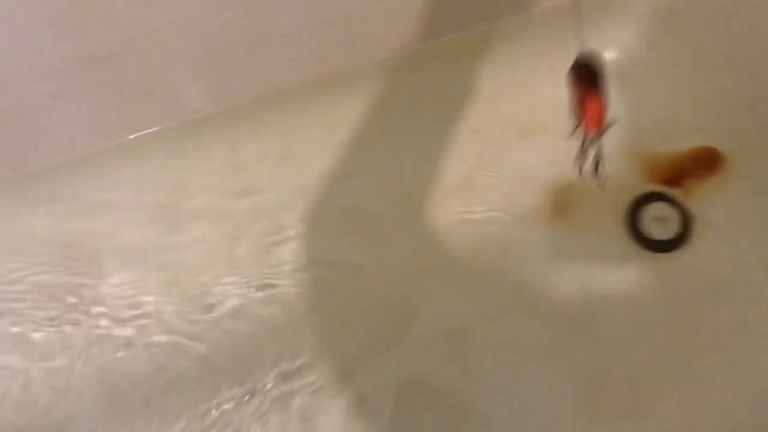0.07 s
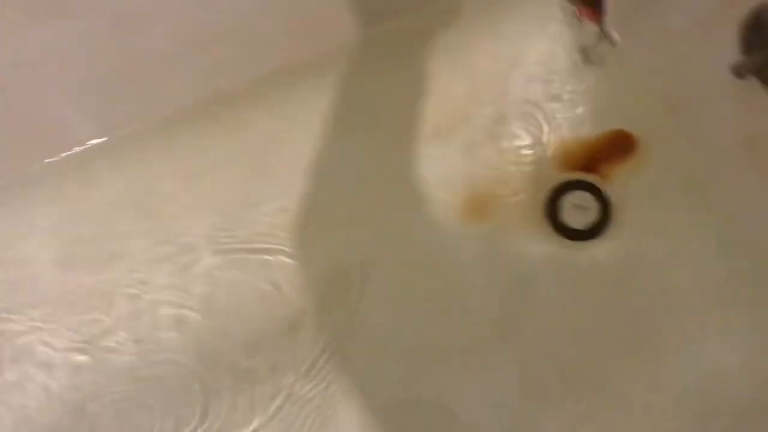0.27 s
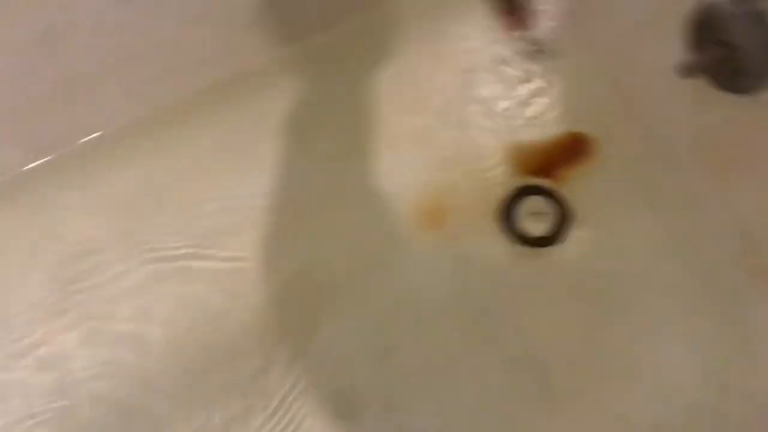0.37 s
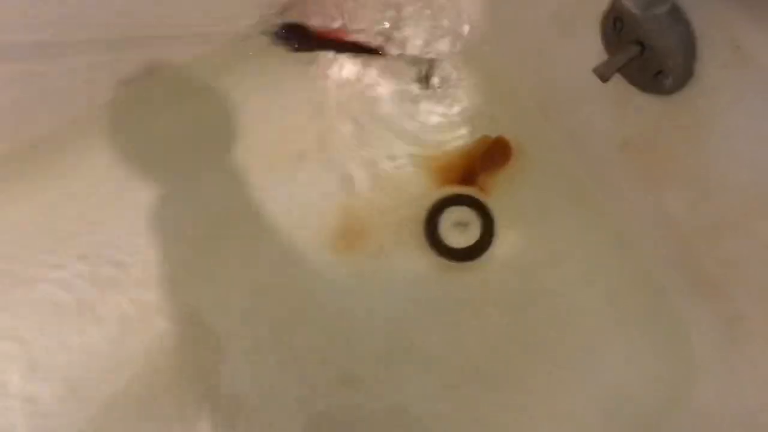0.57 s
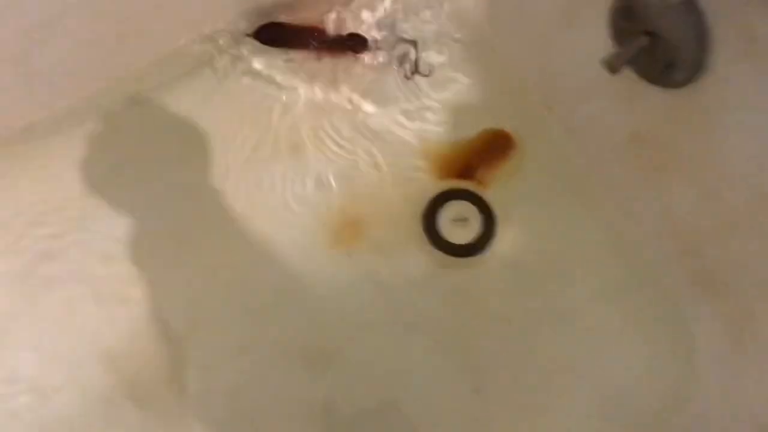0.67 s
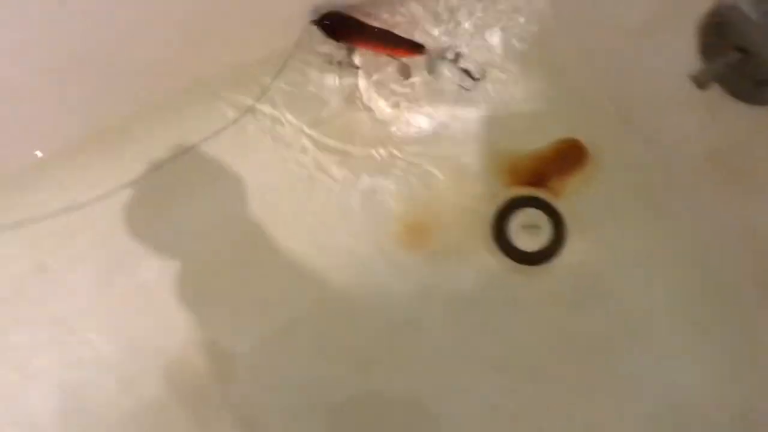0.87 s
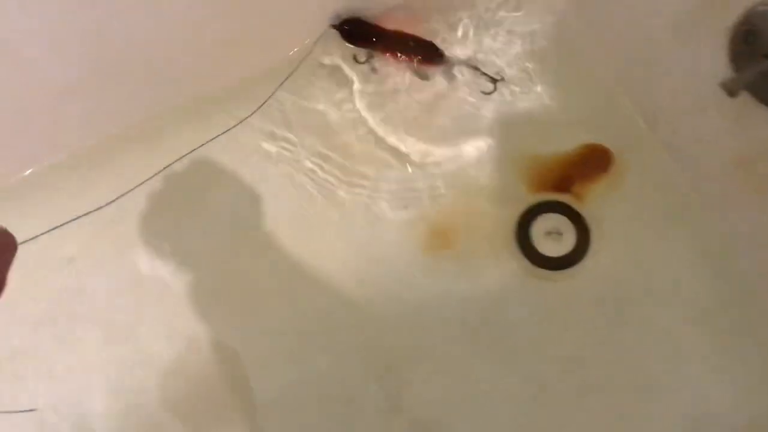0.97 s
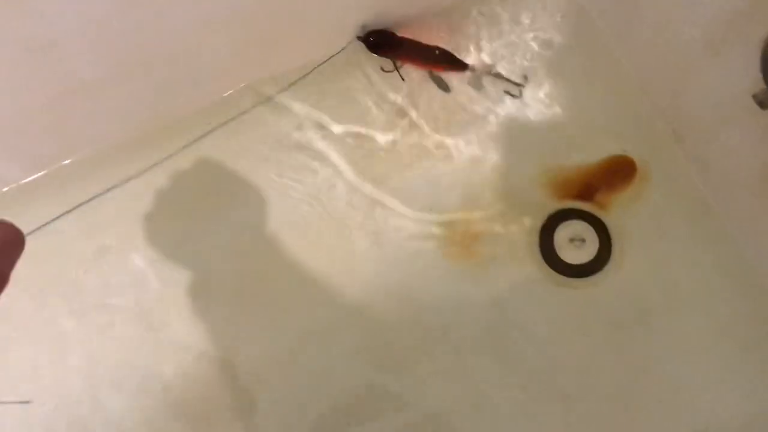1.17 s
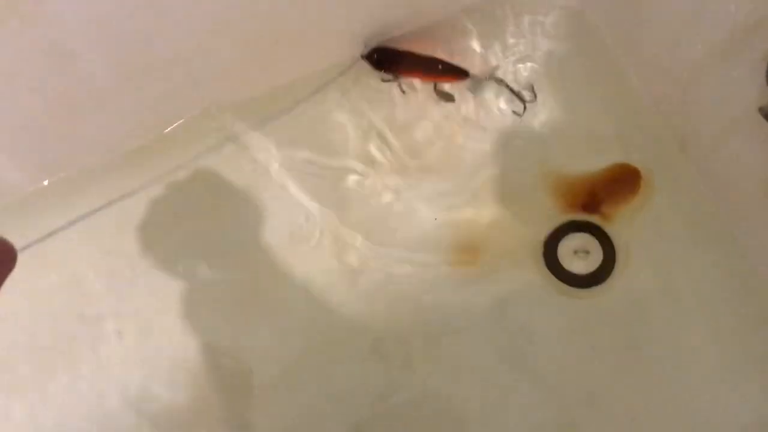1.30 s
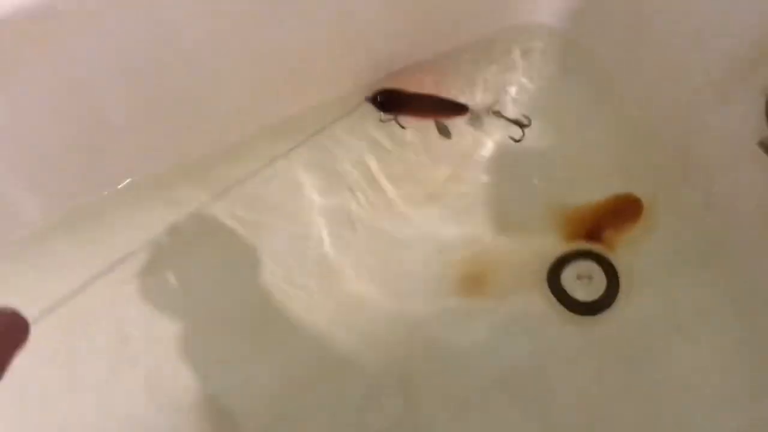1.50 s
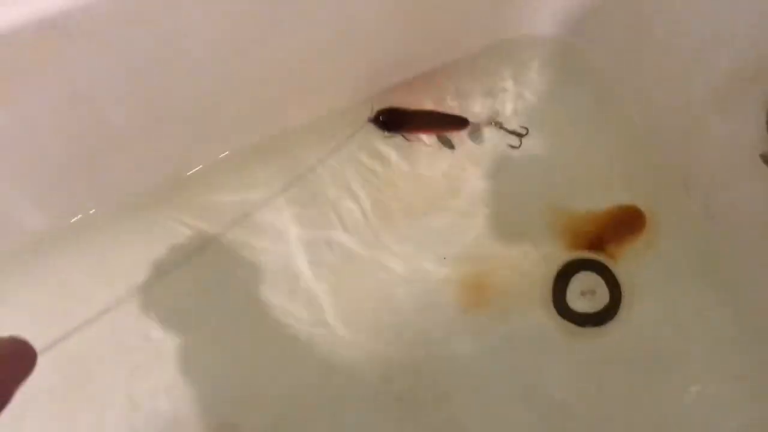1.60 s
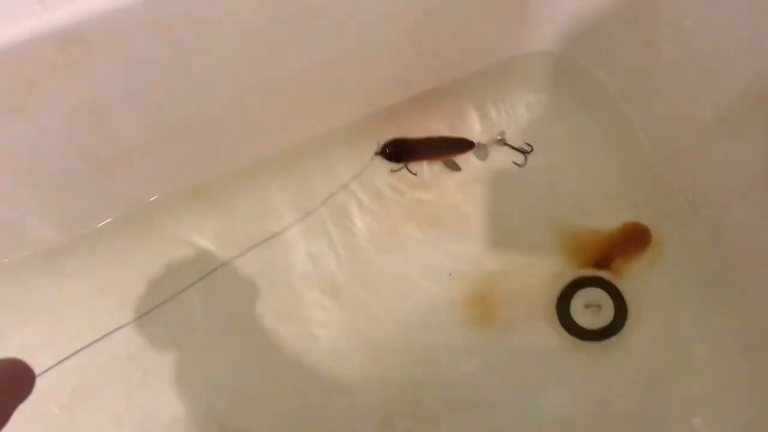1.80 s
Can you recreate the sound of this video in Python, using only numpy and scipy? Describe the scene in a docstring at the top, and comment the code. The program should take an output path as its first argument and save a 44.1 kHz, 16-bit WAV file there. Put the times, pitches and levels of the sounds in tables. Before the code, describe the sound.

Sharp splash of a lure dropping into bathwater, followed by one knock and faint hook ticks.

```python
"""In a small bathroom, a hard fishing lure drops into a shallow bath. It slaps the water, its hooks
jingle, trapped air gulps and spray patters back. It knocks once against the tub, then its hooks tick
and tremble as it drifts on the line. The tub and the room echo briefly, over a low, wavering hum."""
import sys
import numpy as np
from scipy import signal
from scipy.fft import rfft, irfft, next_fast_len
from scipy.io import wavfile
from scipy.ndimage import map_coordinates

SR = 44100
rng = np.random.default_rng(int(sys.argv[2]) if len(sys.argv) > 2 else 0)


def store_wav(level_fs):
    """Save 16-bit WAV to argv[1]."""
    pcm = np.round(np.clip(np.atleast_2d(level_fs), -1, 1) * 32767)
    wavfile.write(sys.argv[1], SR, pcm.T.astype(np.int16))


N = 81585

# The lure hits the water. A fade (t60 in the code) is the time a sound takes to drop by 60 dB.
# t/s, level/dB, attack/s, fade/s, plop level/dB, crack over fizz/dB, brightness/(dB per octave)
SLAPS = [(0.2216, -20.5, .0002, 0.13, -33, 7.5, 1), (0.2269, -24.5, 0.00043, 0.12, -48, -6, 0),
         (0.2501, -22, 0.0018, 0.078, -45, 2, 14), (0.2973, -20, 0.0026, 0.16, -45.5, -11, -0.5),
         (0.326, -24, 0.0038, 0.073, -50.5, -9, -5.5)]
# How strong the fizz and the plop are from low to high pitch (their "colour"): f/Hz, level/dB
FIZZ_COLOUR = [(300, -35), (1600, 0.5), (2400, 1), (4000, 2), (5200, 4.5), (6700, -11), (7800, -17),
               (8800, -1.5), (10300, -26), (12200, 6), (15500, -1)]
PLOP_COLOUR = [(60, -5.5), (190, -1), (400, 0), (750, 1), (1150, -6.5), (1600, -5), (2100, -6), (3000, -54)]
# The notes of the metal hooks, and of the hollow punched in the water: f/Hz, level/dB, fade/s
HOOK_NOTES = [(4740, -1, 0.071), (6659, -7.5, 0.23), (8820, -3, 0.21), (9400, -6, 0.14), (11870, 2, 0.17),
              (14500, 0, 0.12)]
HOLLOW_NOTES = [(360.5, -39, 0.3), (603, -32, 0.091), (1020, -26, 0.048)]

def splash():
    """The hooks and the hollow ring as the lure lands; each slap is a crack, a fizz and a low plop."""
    droplets = tiny_bubbles(per_s=2600, centre_hz=8710, spread=0.395, cycles=43, scatter_db=12.5)
    plop = noise(PLOP_COLOUR)
    landing = SLAPS[0][0]
    out = amp(-30) * ring(HOOK_NOTES, landing) + ring(HOLLOW_NOTES, landing)
    for start, db, attack, t60, plop_db, crack_db, tilt in SLAPS:
        spurts = amp(2 * wobble(per_s=450))  # the sheet of water tears unevenly
        fizz = unit(spurts * (noise(tilted(FIZZ_COLOUR, tilt)) + amp(-1) * droplets))
        crack = amp(crack_db) * burst(start, t60=0.0091, attack=attack)
        out += amp(db) * fizz * (burst(start, t60, attack) + crack) / 2
        out += amp(plop_db) * plop * burst(start, t60=0.11, attack=0.0099)
    return out


# The colour of the knock: f/Hz, level/dB
KNOCK_COLOUR = [(600, -19), (1200, -4.5), (2000, -1), (3300, 2), (4200, 5.5), (5000, -2), (6000, 1.5),
                (7800, -10), (8800, -1), (10000, -5), (12200, -4.5), (15500, -9)]
# The notes of the lure striking the tub: f/Hz, level/dB, fade/s
KNOCK_NOTES = [(1168, -9, 0.15), (1535, -3.5, 0.07), (4304, 4.5, 0.08), (5850, -5, .08), (7025, -9, 0.12)]

def knock(start=0.6116):
    """The hard lure hits the wall of the tub: a crack that echoes, and a short, close ring."""
    crack = noise(KNOCK_COLOUR) * burst(start, t60=0.0097, hold=0.0023)
    return amp(-20) * (bathroom(crack, echo_db=-6) + amp(-12) * ring(KNOCK_NOTES, start))


# Single bubbles: t/s, starting f/Hz, level/dB, rise/(octaves per s), swell/s, fade/s
BUBBLES = [(0.159, 1514, -41, 25, 0.0022, 0.013), (.251, 14600, -18, 1.5, .0008, .012),
           (.261, 1783, -34, 0.73, .002, 0.036), (.356, 2230, -25.5, 3.5, 0.00016, 0.021),
           (.359, 415, -37.5, 6.9, 0.0034, 0.054), (0.366, 800, -30.5, 6.36, 0.015, 0.095),
           (.382, 845.5, -28.5, 34, 0.0072, 0.067), (0.4, 1426, -30, 15.7, 0.012, 0.018),
           (0.467, 12030, -31.5, 3.5, 0.00091, 0.023), (0.479, 4076, -32.5, 15, 0.0021, 0.012),
           (0.482, 8120, -35.5, 4.4, .001, 0.028), (0.492, 548, -39.5, 10, 0.0015, 0.026),
           (.508, 2630, -43, 27, 0.00099, 0.017), (1.144, 6480, -51.5, 3, 0.0011, 0.024)]

def bubbles():
    """Trapped air rings, and its pitch climbs as it nears the surface."""
    out = np.zeros(N)
    for start, hz, db, rise, swell, t60 in BUBBLES:
        pitch = hz * 2 ** (rise * np.clip(clock() - start, 0, swell + t60))
        out += amp(db) * burst(start, t60, swell) * np.sin(2 * np.pi * np.cumsum(pitch) / SR)
    return out


# How loud the falling spray and the sloshing water are over time: t/s, level/dB
SPRAY = [(.215, -71), (.228, -36), (.285, -51), (.31, -47), (.375, -41.5), (.42, -53), (.47, -43),
         (.52, -56), (.56, -55.5), (.68, -60.5), (.92, -67.5), (1.2, -75), (1.85, -101)]
SLOSH = [(.14, -70.5), (.21, -60), (.26, -54), (.34, -40), (.41, -43), (.46, -52.5), (.5, -47),
         (.56, -49.5), (.7, -64.5), (.83, -57), (.935, -61), (1.05, -69), (1.4, -71.5), (1.85, -71.5)]

def settling_water():
    """Fine spray patters back and the stirred-up water gurgles."""
    drops = tiny_bubbles(per_s=2700, centre_hz=8760, spread=0.459, cycles=34, scatter_db=16.5)
    gurgles = tiny_bubbles(per_s=1100, centre_hz=1110, spread=0.422, cycles=12.7, scatter_db=16)
    hiss = amp(-2.5) * noise(FIZZ_COLOUR)  # the finest droplets blur together
    return level(SPRAY) * unit(drops + hiss) + level(SLOSH) * gurgles


# Hooks touch the tub: t/s, level/dB, fade/s, brightness/(dB per octave), ring f/Hz, ring over scratch/dB
TICKS = [(.003, -47.5, 0.091, 9, 5400, -7.5), (0.157, -50.5, 0.024, -5, 2620, -5),
         (0.441, -38, 0.042, 10, 5260, -15), (0.553, -44.5, 0.044, -1, 3540, -31),
         (0.761, -44.5, 0.051, -2, 3396, -4.5), (0.8214, -44, 0.085, 2, 2790, -7),
         (0.8756, -42, 0.042, 2, 4290, -15.5), (0.9192, -45, 0.05, 2.5, 4280, -19),
         (0.946, -54, 0.12, -0.5, 4370, -17), (1.0455, -53, 0.058, 0, 4310, -9),
         (1.118, -59, 0.027, 1, 4500, -7), (1.1592, -49.5, 0.021, 8, 5300, -18),
         (1.4005, -56.5, 0.13, 0.5, 9580, -2)]
# The colour of the scratch: f/Hz, level/dB
TICK_COLOUR = [(500, -13), (2300, 0), (3400, -1), (5500, 0.5), (7000, 1.5), (8500, -5.5), (12000, -1.5),
               (15500, -8.5)]

def ticks():
    """Each light touch makes a short scratch, and one hook rings faintly."""
    out = np.zeros(N)
    for start, db, t60, tilt, hz, ring_db in TICKS:
        scratch = noise(tilted(TICK_COLOUR, tilt)) * burst(start, t60)
        out += amp(db) * (scratch + ring([(hz, ring_db, 0.084)], start))  # the ring fades in 0.084 s
    return out


# Hooks that keep shaking: t/s, f/Hz, width/Hz, level/dB, fade/s
TREMBLES = [(.44, 5455, 139, -55.5, 1.4), (.49, 3436, 79, -61.5, 1.5), (0.754, 7080, 600, -53.5, 0.46),
            (.93, 4300, 160, -67, 1.1), (1.19, 5360, 800, -70.5, 0.69)]

def trembling_hooks():
    """Each loose hook sings unsteadily, like noise squeezed close to one pitch."""
    hz = np.fft.rfftfreq(N, 1 / SR)
    out = np.zeros(N)
    for start, centre, width, db, t60 in TREMBLES:
        band = rfft(rng.standard_normal(N)) / (1 + (2 * (hz - centre) / width) ** 2)
        out += amp(db) * unit(irfft(band, N)) * burst(start, t60, attack=0.006)
    return out


# Bursting bubbles: t/s, level/dB
POPS = [(0.7214, -31), (0.7475, -38)]
# Their colour: f/Hz, level/dB
POP_COLOUR = [(9500, -37), (11500, 12), (13000, 10), (15500, -16)]

def pops():
    """Tiny bubbles burst at the surface with crisp, very high clicks."""
    return noise(POP_COLOUR) * sum(amp(db) * burst(start, t60=0.0093) for start, db in POPS)


# Bumps: t/s, level/dB, fade/s
BUMPS = [(0.922, -49, 0.19), (1.722, -46.5, 0.049), (1.739, -48, 0.11)]
# Their colour: f/Hz, level/dB
BUMP_COLOUR = [(80, -3.5), (550, 5.5), (1400, -5), (2500, -20), (6000, -50)]

def bumps():
    """Soft, dull bumps with no ring."""
    loudness = sum(amp(db) * burst(start, t60, attack=0.00076) for start, db, t60 in BUMPS)
    return noise(BUMP_COLOUR) * loudness


# How loud the hum is over time: t/s, level/dB
HUM = [(0, -63), (.25, -47.5), (.31, -67), (.35, -46), (.6, -55.5), (.68, -58.5), (.84, -46), (1.13, -47.5),
       (1.2, -59), (1.4, -71), (1.49, -45), (1.55, -53.5), (1.85, -55)]
# The room's faint tones, and the colour of its noise: f/Hz, level/dB
ROOM_TONES = [(117.5, -69), (145, -64), (241, -65), (269, -64), (387, -70)]
ROOM_COLOUR = [(25, -21.5), (60, -4.5), (135, -11), (200, -21.5), (255, -15.5), (400, -20), (600, -25),
               (1100, -34.5), (2000, -39.5), (6000, -44.5), (10500, -53), (14300, -40), (16000, -51)]

def background():
    """A low hum swells and dips over faint, wavering tones and soft room noise."""
    def tone(hz):
        return np.sqrt(2) * np.sin(2 * np.pi * (hz * clock() + rng.random()) + 0.99 * wobble(per_s=14))
    hum = level(HUM) * tone(hz=58.9)
    return hum + sum(amp(db) * tone(hz) for hz, db in ROOM_TONES) + amp(-54) * noise(ROOM_COLOUR)


# How long the room echoes at each pitch: f/Hz, fade/s
ROOM_FADE = [(200, 0.47), (1200, 0.29), (4500, 0.31), (9000, 0.21), (15000, 0.14)]

def bathroom(x, echo_db, wall_delay_s=0.004):
    """Adds the quick echoes of the tub and the longer echo of the room."""
    hz, t, hiss = signal.stft(rng.standard_normal(SR // 2), SR, nperseg=128)
    room = fade(t, along(ROOM_FADE, hz)[:, None])
    tub = amp(-1.5) * fade(t, t60=0.03)
    echo = signal.istft(hiss * (room + tub), SR, nperseg=128)[1]
    echo = np.pad(echo / np.linalg.norm(echo), (int(wall_delay_s * SR), 0))
    return x + amp(echo_db) * signal.fftconvolve(x, echo)[:N]


def tiny_bubbles(per_s, centre_hz, spread, cycles, scatter_db):
    """A steady stream of tiny bubbles, each a short ping that rises in pitch."""
    when, pitch, size = rng.spawn(1)[0].random((int(per_s * N / SR), 3)).T[:, :, None]
    hz = np.minimum(centre_hz * np.exp(spread * np.log(pitch / (1 - pitch)) / 2), SR / 2)
    t = np.arange(int(min(2 * cycles / centre_hz * SR, SR // 32))) / SR
    age = hz * t / cycles  # runs from 0 to 1 over a bubble's life
    loudness = amp(scatter_db * size ** 2) * fade(age, 0.84) * (1 - np.exp(-hz * t))
    glide = 1 + 0.21 * np.minimum(age, 1) / 2  # the pitch gains 21% in that time
    pings = loudness * np.sin(2 * np.pi * hz * t * glide)
    places = (when * N).astype(int) + np.arange(len(t))
    return unit(np.bincount(places.ravel(), pings.ravel(), N)[:N])


def ring(notes, start):
    """Fading notes struck together, each with a slightly random strength."""
    t = np.arange(SR // 2) / SR
    x = sum(amp(db + rng.normal(0, 2.4)) * fade(t, t60) * np.sin(2 * np.pi * (hz * t + rng.random()))
            for hz, db, t60 in notes)
    return np.pad(x, (round(start * SR), N))[:N]


def burst(start, t60, attack=0.00034, hold=0):
    """A loudness shape that rises, holds and dies away."""
    t = np.maximum(clock() - start, 0)
    return np.minimum(t / attack, 1) * fade(np.maximum(t - attack - hold, 0), t60)


def noise(colour):
    """Noise of strength 1 with the given colour."""
    gain = amp(along(colour, np.fft.rfftfreq(N, 1 / SR)))
    return unit(irfft(rfft(rng.standard_normal(N)) * gain, N))


def tilted(colour, db_per_octave):
    """The same colour, brighter or duller."""
    return [(hz, db + db_per_octave * np.log2(hz)) for hz, db in colour]


def along(points, hz):
    """Reads a table between its pitches."""
    pitches, values = np.transpose(points)
    return np.interp(np.log(hz + 1), np.log(pitches + 1), values)


def level(rows):
    """Joins t/s, level/dB points into a loudness curve."""
    return amp(np.interp(clock(), *np.transpose(rows)))


def wobble(per_s):
    """A smooth curve through per_s random points a second."""
    return map_coordinates(rng.standard_normal(512), [clock() * per_s], mode="mirror")


def fade(t, t60):
    return np.exp(-np.log(1000) * t / t60)


def amp(db):
    return 10 ** (np.asarray(db) / 20)


def unit(x):
    """Scales a sound to an average strength (rms) of 1."""
    return x / np.sqrt(np.mean(x ** 2) + 1e-20)


def clock():
    return np.arange(N) / SR


def scene():
    """Mixes it all; the pops and the trembling hooks stay dry, without echo."""
    water = bathroom(splash() + settling_water(), echo_db=-9.5)
    water += bathroom(bubbles(), echo_db=-10.5) + pops()
    touches = knock() + bathroom(bumps(), echo_db=-6) + bathroom(ticks(), echo_db=-7.5)
    return (water + touches + trembling_hooks() + background())[None]


def record(dry):
    """Cuts away the very highest treble."""
    top_hz = 16050
    size = next_fast_len(N + SR // 2)
    hz = np.fft.rfftfreq(size, 1 / SR)
    return irfft(rfft(dry, size) / (1 + (hz / top_hz) ** 160), size)[:, :N]


dry = scene()
out = record(dry)
store_wav(out)
```